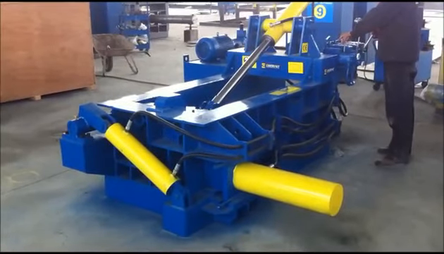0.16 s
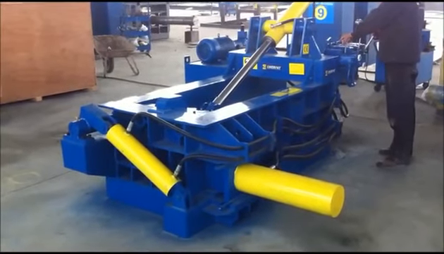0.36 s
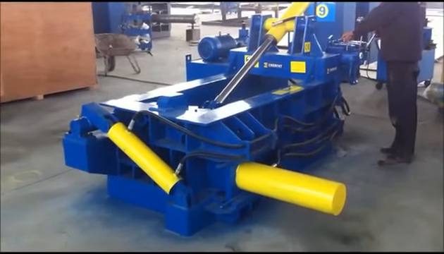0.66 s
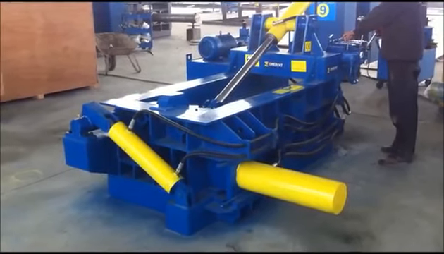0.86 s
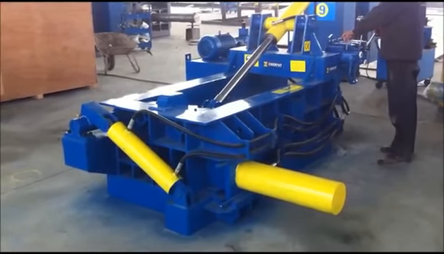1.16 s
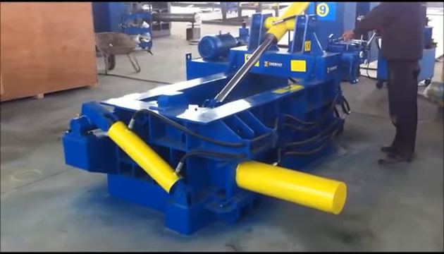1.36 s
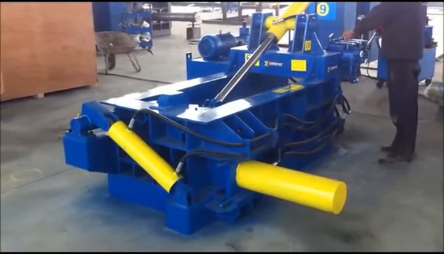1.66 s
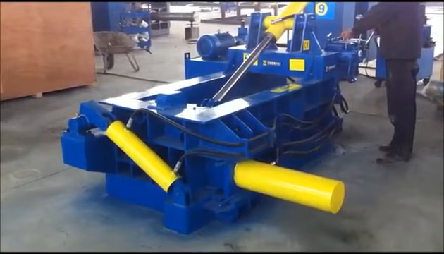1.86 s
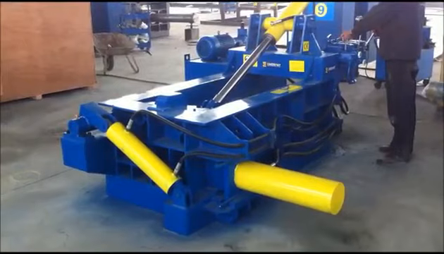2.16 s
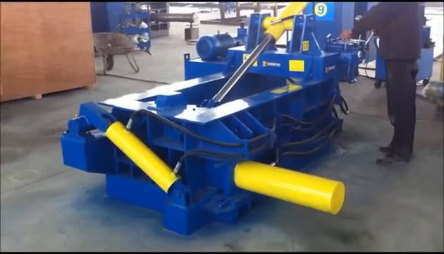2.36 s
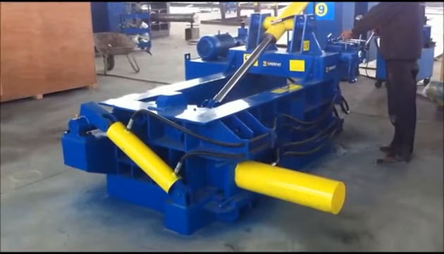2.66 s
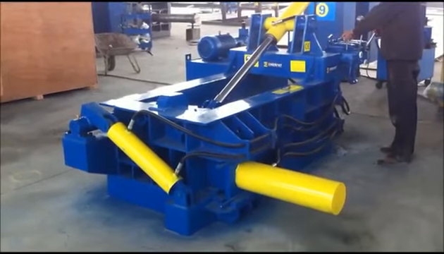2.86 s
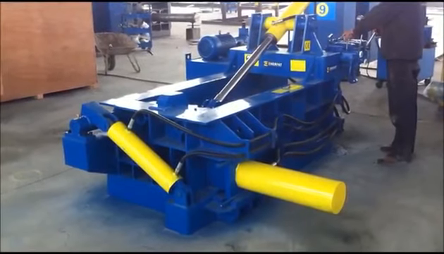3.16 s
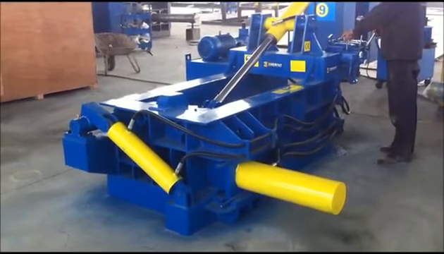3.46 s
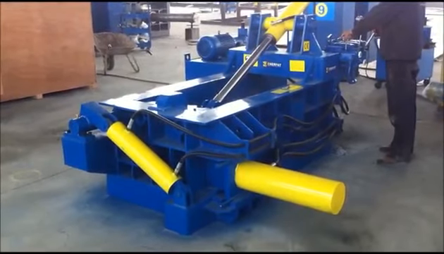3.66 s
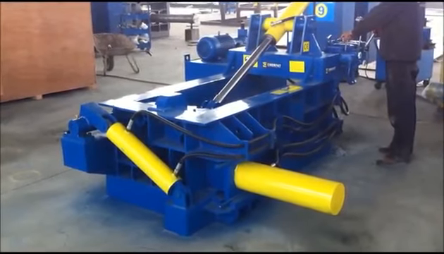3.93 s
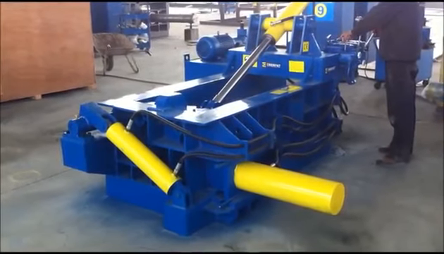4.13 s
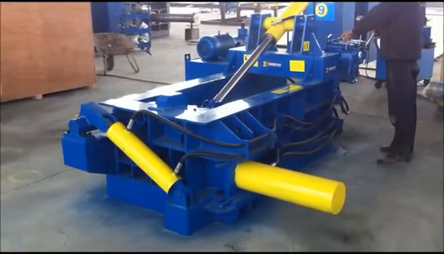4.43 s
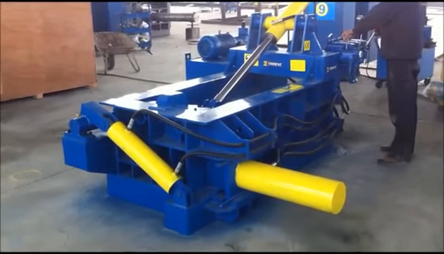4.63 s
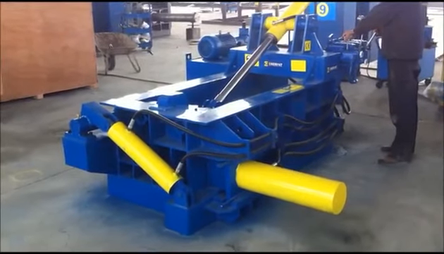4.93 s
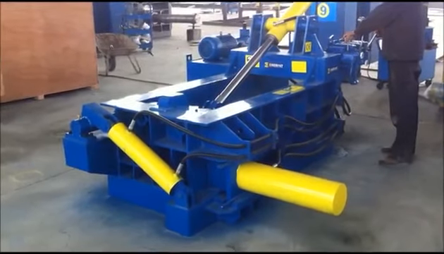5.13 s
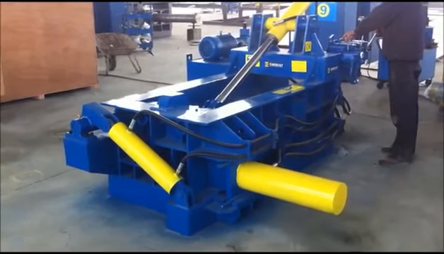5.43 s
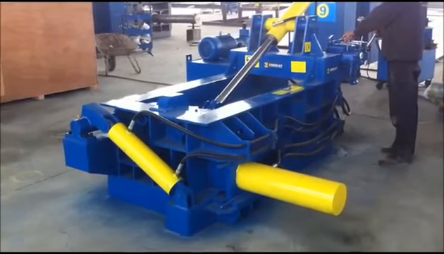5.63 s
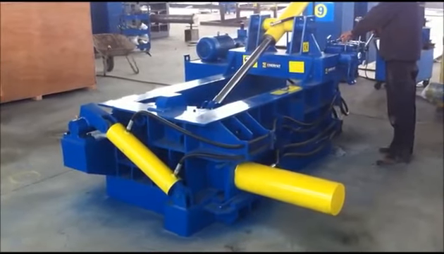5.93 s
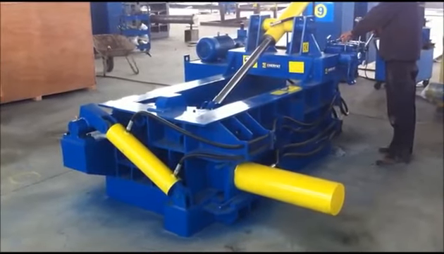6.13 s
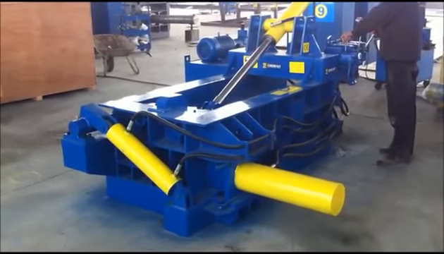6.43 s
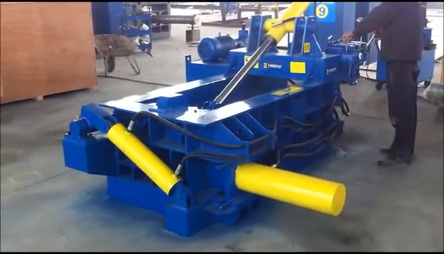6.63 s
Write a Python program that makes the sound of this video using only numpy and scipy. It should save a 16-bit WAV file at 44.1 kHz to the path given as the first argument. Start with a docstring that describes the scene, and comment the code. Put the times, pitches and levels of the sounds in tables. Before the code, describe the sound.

A hydraulic scrap baler hisses loudly and steadily in a factory hall, growing brighter, with a brief breathy valve squeal near six seconds.

```python
"""In a factory hall a hydraulic scrap baler slowly moves its lid, a few metres from a hand-held microphone.
Oil cavitates in the valves: noise of uneven bursts is filtered into a hiss that brightens with throttling,
and drives resonances of the valve block, pipes and spool. One valve sings in narrow, sagging bands of noise.
The seven-piston pump hums faintly as sines locked to its shaft; thin whines glide beside it.
Behind lie distant knocks as decaying bursts of low noise, and the hall's noise rumble with wavering drones."""
import sys
import numpy as np
from scipy import signal
from scipy.fft import rfft, irfft, next_fast_len
from scipy.io import wavfile
from scipy.ndimage import map_coordinates

SR = 44100
rng = np.random.default_rng(int(sys.argv[2]) if len(sys.argv) > 2 else 0)


def generate_wav(sig):
    """Save sig (samples, or channels by samples) to the path in sys.argv[1] as 16-bit PCM at SR."""
    pcm = np.round(np.clip(np.atleast_2d(sig).T, -1, 1) * 32767).astype(np.int16)
    wavfile.write(sys.argv[1], SR, pcm)


N = 299439
T = np.arange(N) / SR  # s
FREQS = np.maximum(np.arange(N // 2 + 1) * SR / N, 1)  # Hz

# Throttling of the oil, which drives hiss, spray, pipes and spool: time_s, strength_db
THROTTLING = [(0.07, -22), (0.42, -26), (0.61, -24), (1.67, -24), (1.99, -21.5), (2.15, -23.5), (3.09, -22),
              (3.59, -24), (4.28, -19), (4.37, -21.5), (4.67, -18), (4.88, -22.5), (4.97, -18.5),
              (5.51, -23), (5.81, -22), (5.94, -19), (6.63, -20), (6.76, -20)]
# Spectral shapes of the oil noise: frequency_hz, relative_level_db
HISS_SPECTRUM = [(900, -27), (1750, -10.5), (2150, -7), (3300, -2), (3900, 0.5), (4800, 4.5), (5900, 3),
                 (7000, 3.5), (8200, 7.5), (9300, -16), (10200, 0.5), (10700, 1.5), (11300, -4),
                 (15000, -27)]
SPRAY_SPECTRUM = [(4000, -34.5), (6500, 9), (8000, -9), (9800, 12), (10600, -2), (11300, 6.5), (11700, 1.5),
                  (12800, 2.5), (13900, -0.5), (15000, -7)]
# Resonances of the steel: frequency_hz, width_hz (between points 3.5 dB down), relative_level_db
BLOCK_MODES = [(2728, 170, 5), (2855, 150, 2), (2957, 190, 1.5)]
PIPE_MODES = [(2054, 44, -11), (2233, 145, -4), (3537, 80, -5.5), (3630, 63, -2.5), (4320, 210, -1.5),
              (4453, 68, -9.5), (5150, 150, -28), (5532, 79, -4)]
SPOOL_MODES = [(6434, 205, 3), (6673, 247, 2), (7350, 700, -4.5), (8680, 425, 1), (9900, 200, -40.5)]
# Ring of the valve block, before a small common lift: time_s, level_db
BLOCK_RING = [(0.04, -28.5), (0.43, -32.5), (0.86, -28.5), (1.29, -30.5), (2.83, -27.5), (3.56, -32.5),
              (3.8, -28), (4.14, -33.5), (4.17, -31), (5.09, -31), (5.62, -36), (5.84, -29.5),
              (6.76, -29.5)]
# Partials of the singing valve: frequency_ratio, relative_level_db
SINGING_PARTIALS = [(1, 2), (1.103, 1.5), (1.148, 0.5), (1.85, -2)]
# The pump's main tone, before a small lift: time_s, level_db
PUMP_HUM = [(0.04, -52), (0.17, -46.5), (0.39, -53), (0.43, -42.5), (0.71, -36.5), (0.9, -50), (1.41, -37),
            (1.65, -52), (1.74, -42), (1.82, -62), (2.02, -45), (2.15, -50.5), (3.26, -41), (4.03, -43),
            (4.08, -50), (4.46, -43.5), (5.39, -47.5), (5.71, -39.5), (5.97, -46), (6.76, -44.5)]
# Weaker pump and motor tones: multiple_of_shaft_rate, mean_level_db
SHAFT_ORDERS = [(7, -57.5), (21, -57.5), (28, -58), (33, -53), (37, -55), (42, -56.5), (53, -55.5)]
# Faint gliding whines: start_s, length_s, start_pitch_hz, glide_hz_per_s, level_db, width_hz
WHINES = [(0.7, 0.93, 378, 112, -50, 22), (1.6, 2, 635, -1, -51, 10), (2.35, 0.9, 500, -40, -52, 14),
          (3.7, 3.2, 613, -26, -54, 10)]
# Dull distant knocks: start_s, level_db (of the decay, before the soft onset)
KNOCKS = [(5.07, -43), (5.16, -45), (5.66, -45), (6.059, -45)]
# Spectral shape of a knock: frequency_hz, relative_level_db
BOOM_SPECTRUM = [(40, -40), (95, -2.5), (150, -1), (260, -9), (600, -37)]
# Spectral shape of the hall's rumble: frequency_hz, relative_level_db
HALL_SPECTRUM = [(20, -38), (50, -30), (80, -14.5), (120, -7), (190, 1), (290, 2.5), (385, 4), (460, -1.5),
                 (670, 0), (900, 2), (1200, -2.5), (1800, -2.5), (3000, -4), (12000, -33)]
# Other machines in the hall: mean_pitch_hz, mean_level_db
DRONES = [(94, -63.5), (205, -55), (258, -62)]

USUAL_FLOW_DB = -22
# Level at the usual flow (dB; for pipes and spool at time 0), and dB gained per dB of flow
HISS_DB, HISS_PER_FLOW = -23.5, 0.69
SPRAY_DB, SPRAY_PER_FLOW = -25.4, 1.2
PIPES_DB, PIPES_PER_FLOW = -28, 0.17
SPOOL_DB, SPOOL_PER_FLOW = -26.5, 0.59
# Pressure builds through the stroke, so pipes and spool ring ever harder
PIPES_RISE_DB_PER_S, SPOOL_RISE_DB_PER_S = 0.38, 0.6856
# The song's level and pitch are those of a partial of ratio 1 and 0 dB when the swell ends
SING_FULL_S, SING_HOLD_S, SING_DB = 6.02, 0.37, -33.5
SING_SWELL_DB_PER_S, SING_FADE_DB_PER_S = 18, 55
SING_HZ, SING_SAG_HZ_PER_S = 2382, 45
SHAFT_HZ = 24.886  # mean rate
WHINE_FADE_S = 0.15
RUMBLE_DB = -37
TOP_HZ = 15000


def oil_jet(unsteady_db=0.54):
    """Cavitation noise: throttled oil hisses broadly, and a finer spray grows faster with the flow."""
    flow_db = flow()
    hiss_db = HISS_DB + HISS_PER_FLOW * flow_db + unsteady_db * walk(3)
    spray_db = SPRAY_DB + SPRAY_PER_FLOW * flow_db
    hiss = reflections(colour(cavitation(), HISS_SPECTRUM), early_db=-4, late_db=-4.5)
    spray = reflections(colour(cavitation(), SPRAY_SPECTRUM), early_db=-8, late_db=-8.5)
    return hiss * undb(hiss_db) + spray * undb(spray_db)


def steel(block_lift_db=0.38, unsteady_db=0.6):
    """Forced resonance: cavitation rings block, pipes and spool; the last two follow flow and pressure."""
    flow_db = flow()
    block_db = curve(BLOCK_RING) + block_lift_db
    pipes_db = PIPES_DB + PIPES_PER_FLOW * flow_db + PIPES_RISE_DB_PER_S * T
    spool_db = SPOOL_DB + SPOOL_PER_FLOW * flow_db + SPOOL_RISE_DB_PER_S * T
    parts = [(BLOCK_MODES, block_db), (PIPE_MODES, pipes_db), (SPOOL_MODES, spool_db)]
    out = 0
    for modes, level_db in parts:
        ring = drift(resonate(cavitation(), modes), sway_s=0.002)
        level_db = level_db + unsteady_db * walk(3.5)
        out = out + reflections(ring, early_db=-1, late_db=-2.5) * undb(level_db)
    return out


def singing_valve():
    """Flow-excited tone: breathy partials swell, hold and die away, sagging as the pressure changes."""
    age = T - SING_FULL_S
    hz = SING_HZ - SING_SAG_HZ_PER_S * age
    swell_db = -SING_SWELL_DB_PER_S * np.maximum(-age, 0)
    fade_db = -SING_FADE_DB_PER_S * np.maximum(age - SING_HOLD_S, 0)
    tones = sum(undb(db) * breathy_tone(ratio * hz, width_hz=26) for ratio, db in SINGING_PARTIALS)
    return tones * undb(SING_DB + swell_db + fade_db)


def pump(main_lift_db=0.2, waver=0.0013, fading=0.63):
    """Periodic displacement: seven pistons hum at twice their rate, amid fading tones of the shaft."""
    shaft = phase_of(SHAFT_HZ * (1 + waver * walk(9.1)))
    out = np.sin(14 * shaft) * undb(curve(PUMP_HUM) + main_lift_db)
    for order, db in SHAFT_ORDERS:
        # a steady part plus a random one, in amplitude and phase, at unchanged mean power
        path = 1 + fading * (walk(3.6) + 1j * walk(7.4))
        path = path / np.sqrt(1 + 2 * fading ** 2)
        phase = order * shaft + rng.uniform(0, 2 * np.pi)
        out = out + undb(db) * np.real(path * np.exp(1j * phase))
    return np.sqrt(2) * out  # sine levels are rms


def whine(start_s, length_s, hz, glide, db, width_hz):
    """Narrow-band noise: a thin, broken tone fades in, glides evenly and fades out."""
    age = T - start_s
    envelope = np.clip(np.minimum(age, length_s - age) / WHINE_FADE_S, 0, 1)
    return breathy_tone(hz + glide * age, width_hz) * envelope * undb(db)


def knocks(rise_s=0.02, t60_s=0.61):
    """Exponential decay: far blows, of which only a soft boom arrives."""
    boom = unit(colour(rng.standard_normal(N), BOOM_SPECTRUM))
    envelope = 0
    for start_s, db in KNOCKS:
        age = np.maximum(T - start_s, 0)
        onset = 1 - np.exp(-age / rise_s)
        envelope = envelope + onset * undb(db - 60 * age / t60_s)
    return boom * envelope


def hall(waver_db=1.5, waver=0.00518):
    """Diffuse field: fans and far machines add up to a rumble, with a few wavering drones."""
    rumble = unit(colour(rng.standard_normal(N), HALL_SPECTRUM)) * undb(RUMBLE_DB)
    drones = 0
    for hz, db in DRONES:
        tone = np.sin(phase_of(hz * (1 + waver * walk(5.2))))
        drones = drones + tone * undb(db + waver_db * walk(8.9))
    return rumble + np.sqrt(2) * drones


def flow():
    """Throttling as drive: its strength above the usual, in dB."""
    return curve(THROTTLING) - USUAL_FLOW_DB


def cavitation(spread_db=3.0, flutter_db=0.7):
    """Random impulses: countless collapsing bubbles of uneven size, in a stream that flutters a little."""
    sizes = undb(spread_db * np.minimum(rng.exponential(size=N), 5))
    return rng.standard_normal(N) * sizes * undb(flutter_db * walk(32))


def resonate(x, modes):
    """Resonance: each mode is two equal band-pass stages in series."""
    response = 0
    for hz, width, db in modes:
        detuning = hz / width * (FREQS / hz - hz / FREQS)
        response = response + undb(db) / (1 + 1j * detuning / np.sqrt(2)) ** 2
    return irfft(rfft(x) * response, N)


def breathy_tone(hz, width_hz):
    """Random modulation: narrow noise follows a pitch, like a tone smeared by the hall; rms 1."""
    phase = phase_of(hz)
    return walk(width_hz) * np.cos(phase) + walk(width_hz) * np.sin(phase)


def reflections(x, early_db, late_db, early_t60=0.19, late_t60=1.08, places=9):
    """Reverberation: direct sound, near echoes and tail shift as the microphone sways; rms 1."""
    t = T[:SR // 2]
    size = next_fast_len(N + SR // 2, real=True)
    spectrum = rfft(x, size)
    out = 0
    for place in range(places):
        echoes = 0
        for db, t60 in ((early_db, early_t60), (late_db, late_t60)):
            decay = rng.standard_normal(len(t)) * undb(-60 * t / t60)
            echoes = echoes + undb(db) * decay / np.linalg.norm(decay)
        # crossfade from one echo pattern to the next
        nearness = np.maximum(1 - np.abs(T / T[-1] * (places - 1) - place), 0)
        out = out + np.sqrt(nearness) * irfft(spectrum * rfft(echoes, size), size)[:N]
    return unit(x + out)


def drift(x, sway_s):
    """Doppler shift: a slowly wandering delay lets all pitches drift a little."""
    return map_coordinates(x, [np.arange(N) + SR * sway_s * walk(0.6945)], order=3, mode="mirror")


def colour(x, points):
    """Linear filtering: shape a spectrum by (Hz, dB) points, joined on a logarithmic frequency axis."""
    hz, db = np.transpose(points)
    return irfft(rfft(x) * undb(np.interp(np.log(FREQS), np.log(hz), db)), N)


def walk(rate_hz):
    """Band-limited chance: a smooth random curve of rms 1 through 2 * rate_hz values a second."""
    steps = T * rate_hz * 2
    return unit(map_coordinates(rng.standard_normal(2048), [steps], order=3, mode="wrap"))


def phase_of(hz):
    """Phase as the integral of frequency, in radians."""
    return 2 * np.pi * np.cumsum(hz) / SR


def curve(table):
    """Linear interpolation: a table's second column over time."""
    time_s, values = np.transpose(table)
    return np.interp(T, time_s, values)


def undb(db):
    """Logarithmic level: decibels to amplitude gain."""
    return 10 ** (np.asarray(db) / 20)


def unit(x):
    """Mean power: scale to rms 1."""
    return x / np.sqrt(np.mean(x ** 2))


def scene():
    """Superposition: all sources add, and reach both channels alike."""
    baler = oil_jet() + steel() + singing_valve() + pump()
    whines = sum(whine(*row) for row in WHINES)
    sound = baler + whines + knocks() + hall()
    return np.array([sound, sound])


def record(dry):
    """Low-pass filtering: the recorder cuts the top steeply."""
    low_pass = signal.firwin(1501, TOP_HZ, fs=SR, window="blackman")
    return signal.fftconvolve(dry, low_pass[None], mode="same")


dry = scene()
out = record(dry)
generate_wav(out)
```